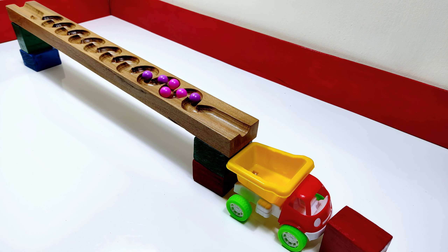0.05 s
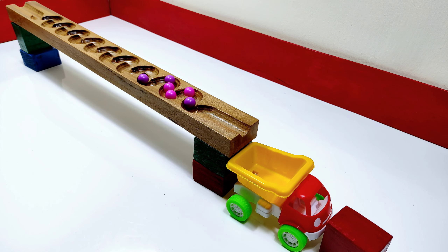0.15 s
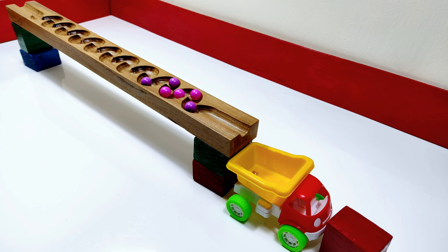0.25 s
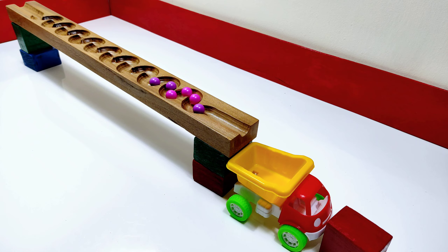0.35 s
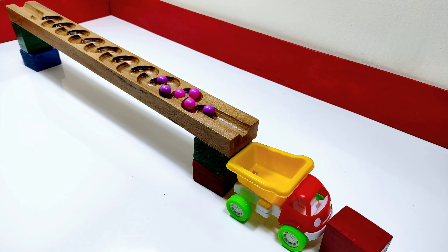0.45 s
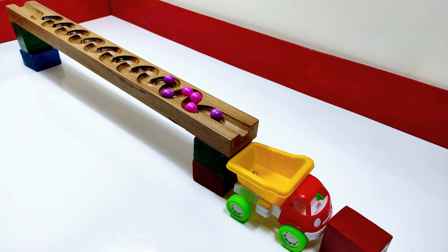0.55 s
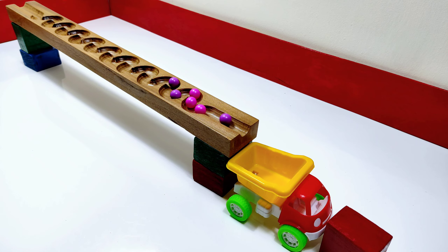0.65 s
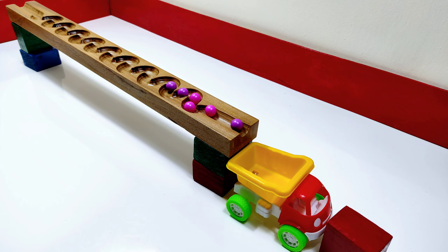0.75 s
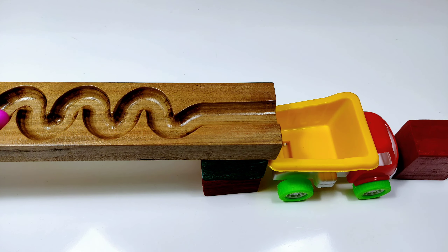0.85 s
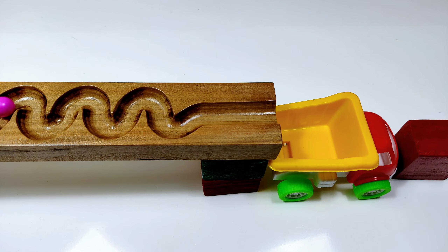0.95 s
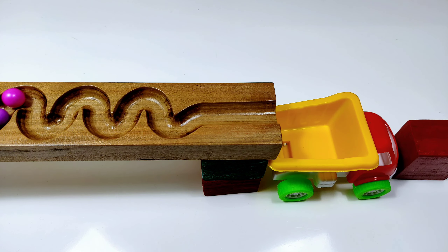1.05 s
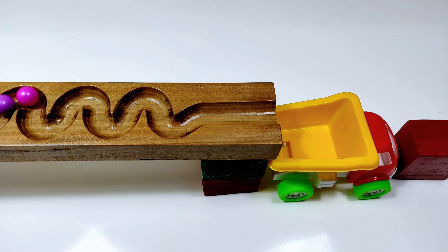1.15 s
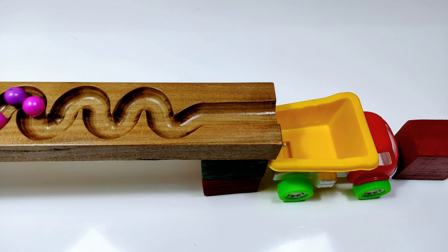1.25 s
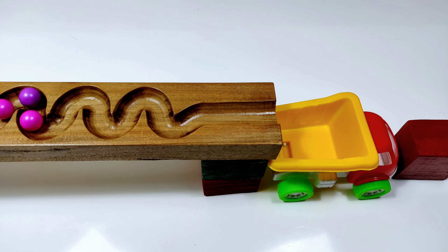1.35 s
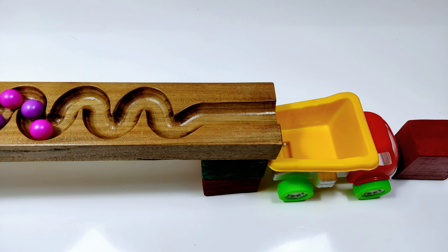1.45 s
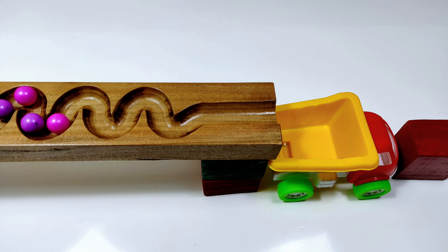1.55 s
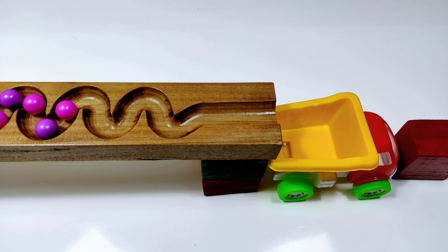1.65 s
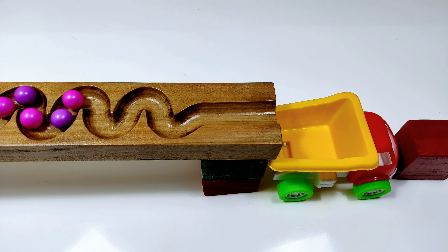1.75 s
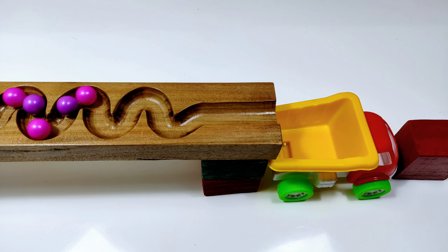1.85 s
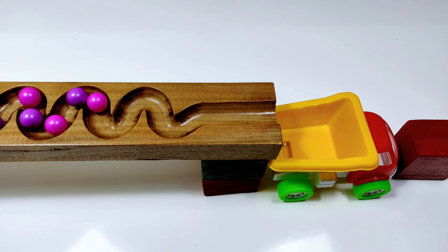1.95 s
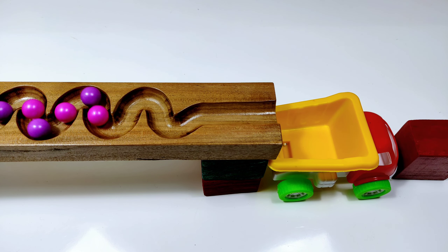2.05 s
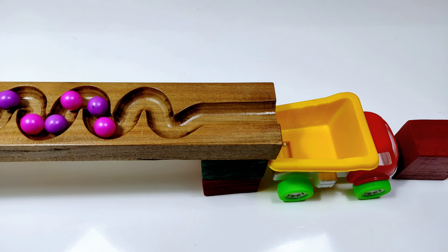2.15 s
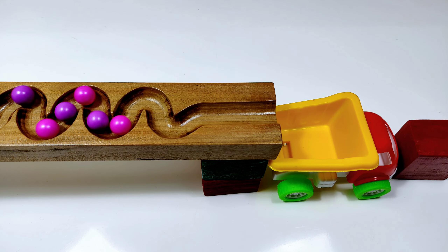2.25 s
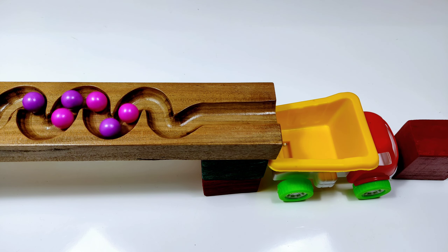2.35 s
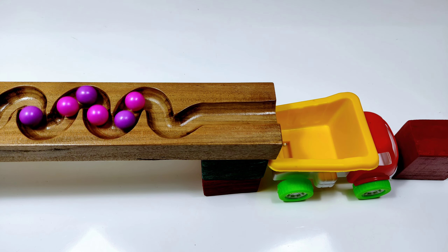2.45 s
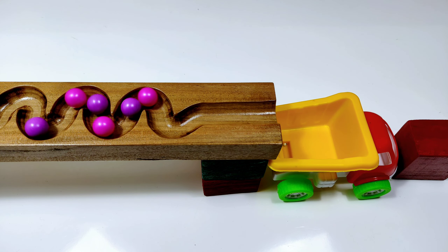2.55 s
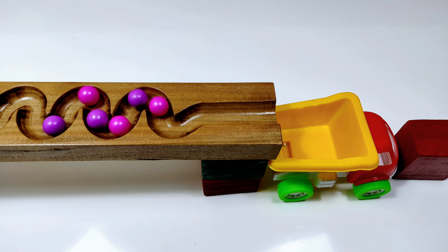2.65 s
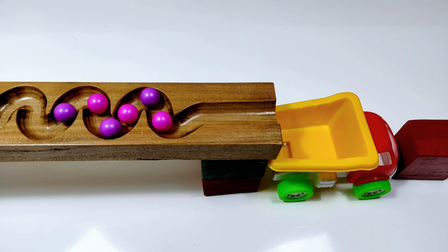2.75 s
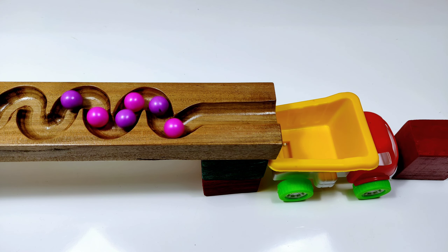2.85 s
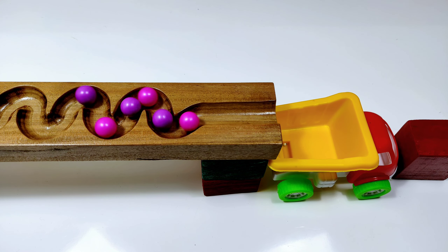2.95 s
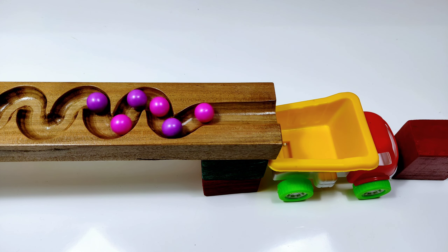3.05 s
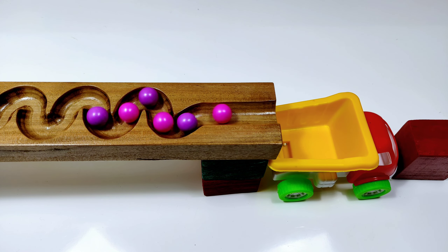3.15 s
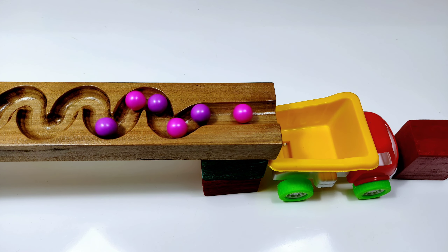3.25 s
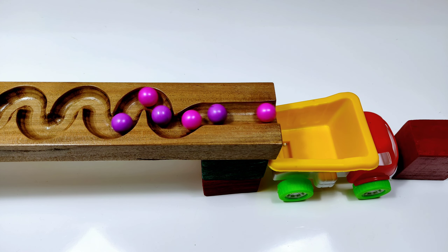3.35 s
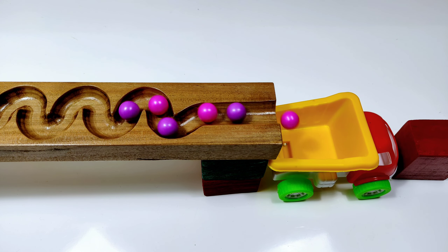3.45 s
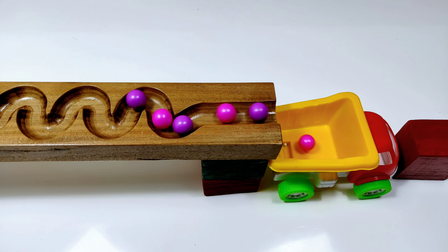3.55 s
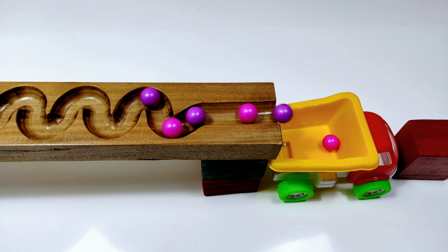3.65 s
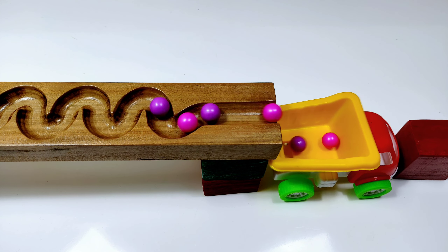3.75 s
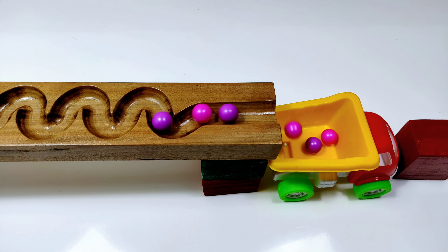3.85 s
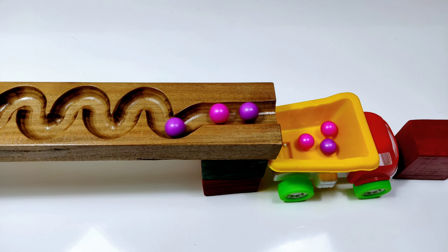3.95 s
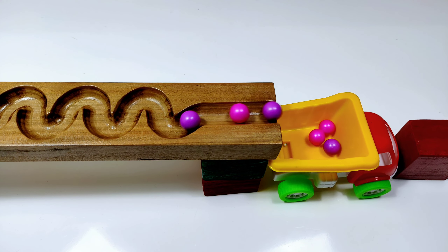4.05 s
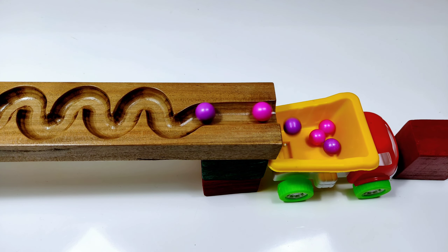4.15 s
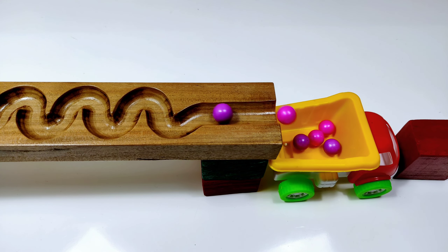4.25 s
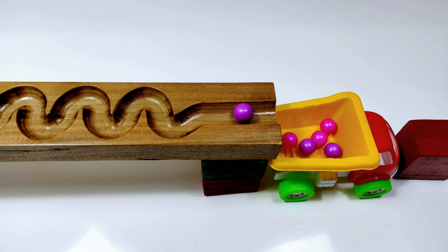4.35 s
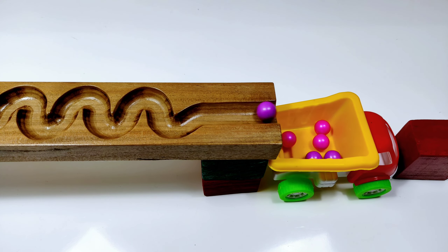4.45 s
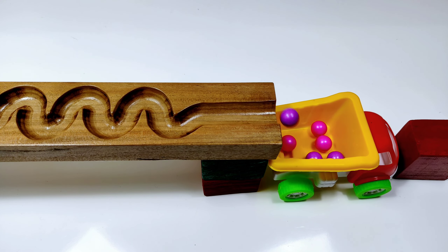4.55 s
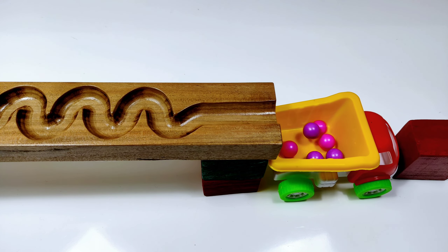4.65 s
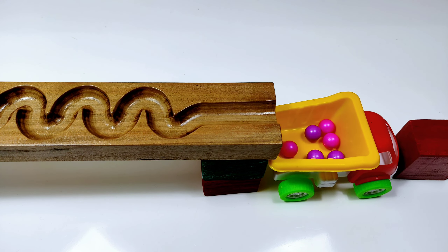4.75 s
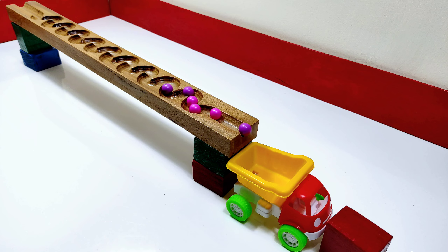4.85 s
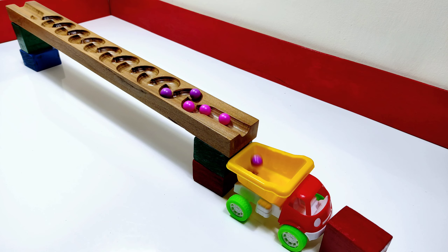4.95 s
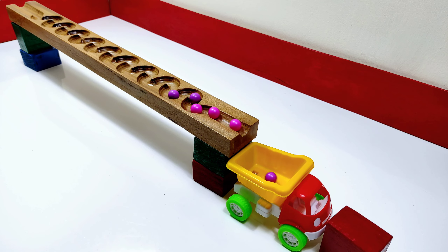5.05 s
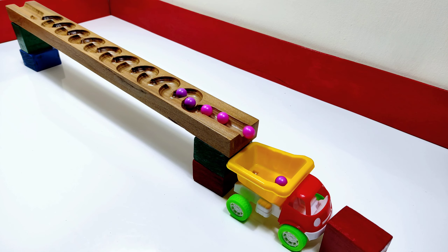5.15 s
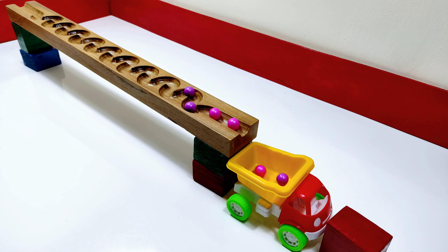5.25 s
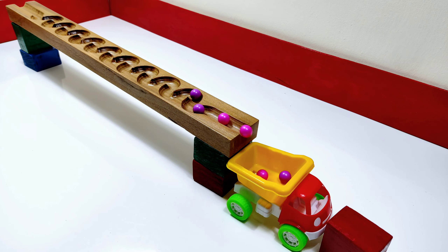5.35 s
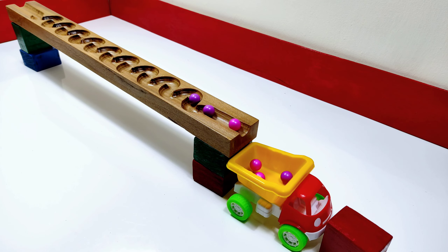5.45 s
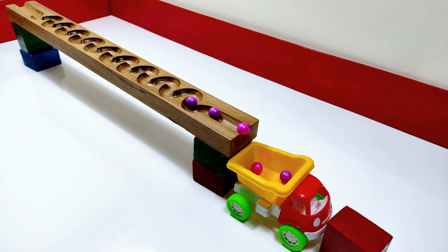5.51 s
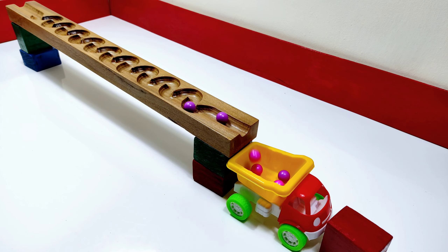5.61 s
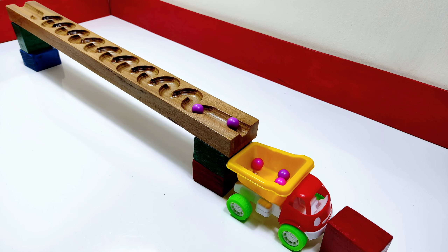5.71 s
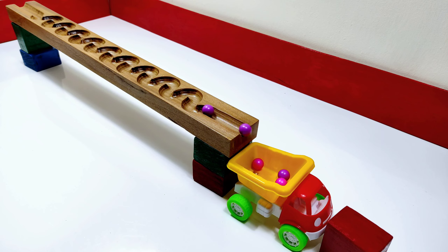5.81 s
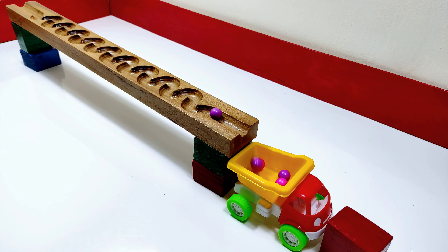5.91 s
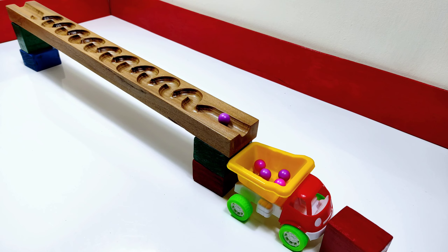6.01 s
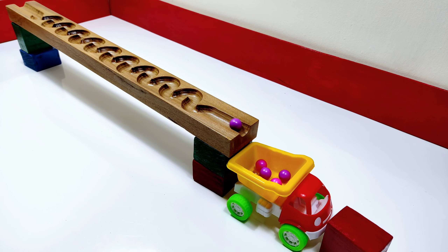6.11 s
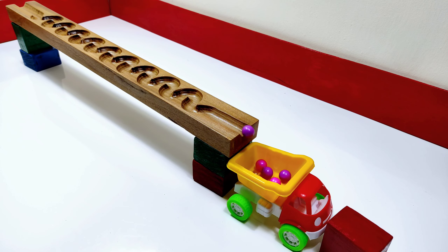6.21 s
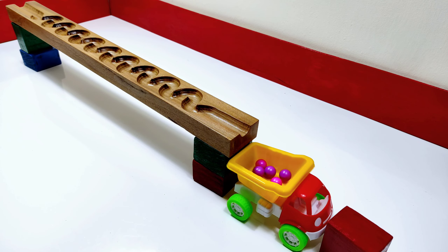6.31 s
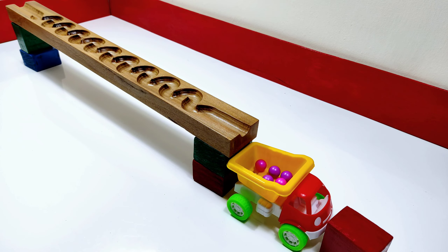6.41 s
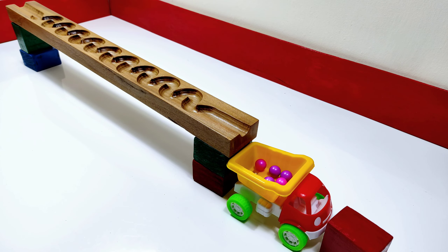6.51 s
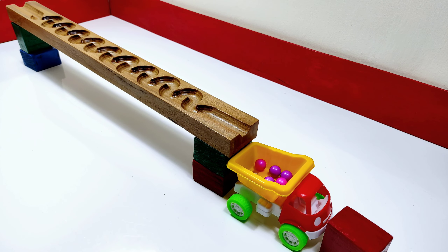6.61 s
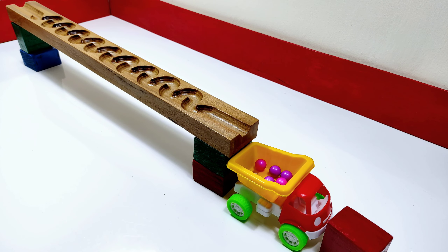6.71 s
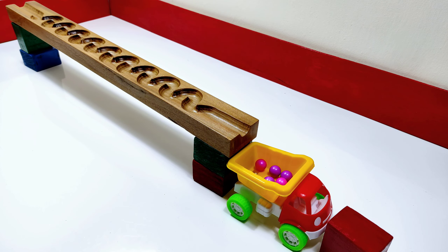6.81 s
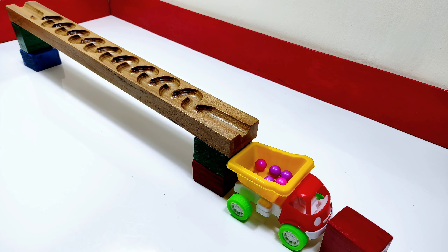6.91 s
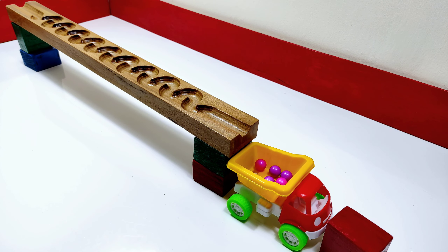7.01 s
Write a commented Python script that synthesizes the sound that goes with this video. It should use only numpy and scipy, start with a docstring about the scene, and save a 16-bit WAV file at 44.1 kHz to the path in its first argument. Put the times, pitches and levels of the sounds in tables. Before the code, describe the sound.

Soft woody rolling and pattering knocks come first, far quieter than what follows. Then marbles strike thin hard plastic about every quarter to half second, cracking sharply, bouncing and ticking against each other in the truck bed. A very brief dip separates this from another series of crisp drops, slightly quieter. The last bounce dies quickly into low rumble and steady hiss, captured close in a small hard room.

```python
"""In a bare room, glass marbles roll down the winding groove of a wooden beam, knocking at each bend.
They drop one by one into the plastic bed of a toy truck, bounce and clack together.
Bed and beam are sets of ringing tones struck by clicks; glass cracks and echoes are shaped noise.
Below lie a low rumble and steady hiss. A gain control ducks a few milliseconds after each loud clack;
twice the level dips briefly, and between these dips the beam is heard from its side."""
import sys
import numpy as np
from scipy import signal
from scipy.fft import rfft, irfft
from scipy.io import wavfile

SR = 44100
rng = np.random.default_rng(int(sys.argv[2]) if len(sys.argv) > 2 else 0)


def waveform_to_disk(signal):
    """Save audio, clipped to [-1, 1], as 16-bit WAV at the path in sys.argv[1]."""
    frames = np.transpose(np.atleast_2d(signal))
    scaled = np.clip(frames, -1, 1) * 32767
    samples = np.round(scaled).astype(np.int16)
    wavfile.write(sys.argv[1], SR, samples)


N = 312007

# All levels in the tables are relative: the layers and the microphone scale them further.
# Marbles hitting the truck bed or each other: [t/s, peak level/dB,
# crack above 4500 Hz: level/dB, clack from 1800 to 4500 Hz: level/dB]
DROPS = [(3.536, -0.5, 3, -4.5), (3.556, -19.5, -3, -6), (3.592, -11.5, -1.5, -3.5),
         (3.596, -21.5, -8.5, 5), (3.629, -15, 0.5, -7), (3.647, -22, -2, -7), (3.679, -13.5, -3, -7),
         (3.708, -27.5, 8, 6), (3.769, 0, 3, -6.5), (3.79, -20, -15.5, -12), (3.819, -20.5, -4, 8.5),
         (3.858, -18, -16, -2.5), (3.876, -26, -3, 5.5), (3.909, 0.5, 1.5, -6), (3.956, -13, 0, 4),
         (3.967, -19, -4, 1), (3.991, -10, 3, 0.5), (4.022, -14.5, -10, -7), (4.051, -20, -7, -7.5),
         (4.066, -26.5, 12.5, -8.5), (4.191, -39, -3, 15.5), (4.211, -1, 3.5, -4.5),
         (4.262, -12.5, -9.5, 1.5), (4.278, -14.5, 4, -0.5), (4.306, -17.5, -1, -0.5),
         (4.339, -3.5, 5.5, 6), (4.344, -16, -1.5, -9), (4.362, -20.5, 2, 2.5), (4.365, -10.5, 3, -9.5),
         (4.387, -21, 9.5, 2), (4.395, -6.5, 7, 1.5), (4.435, -10, 0, -14), (4.461, -13.5, -8, 1),
         (4.503, -18.5, -10, -21), (4.558, -17, -3, -3.5), (4.572, -21, -19, -12), (4.620, -2, 3.5, -4.5),
         (4.634, -23, -12, -14), (4.662, -17, -14, 4), (4.665, -12, 6, 1), (4.675, -10, 0, -9),
         (4.697, -20.5, -5, -10), (4.71, -6.5, 3, -5), (4.727, -21, -12, 5), (4.741, -14.5, -11, -19),
         (4.749, -16.5, 1, -1), (4.754, -9.5, 1, -4), (4.773, -21, -9, -13), (4.793, -27, -9, -6),
         (4.994, -7.5, 8.5, 4.5), (5.044, -20, 5.5, 4.5), (5.076, -42, 11, 9.5), (5.143, -20, -1, 0.5),
         (5.169, -32, 4, -0.5), (5.267, -6.5, 9.5, -0.5), (5.32, -18, 6.5, 5.5), (5.356, -22, 3.5, 1),
         (5.387, -26.5, 0, 0), (5.468, -9, 8, 4), (5.499, -5.5, 4.5, -7), (5.514, -13, -9.5, 2),
         (5.527, -27.5, -3, 2.5), (5.548, -24, -5, -7), (5.574, -18, -16.5, -6.5), (5.597, -36, 1.5, 12),
         (5.656, -8.5, 8, 0.5), (5.668, -13.5, 5.5, -1.5), (5.685, -24, -5, -5), (5.7, -11, 3.5, -2.5),
         (5.715, -14.5, -2, -13.5), (5.736, -21.5, -2, -13), (5.762, -19, 0.5, -10),
         (5.814, -19.5, 2.5, -0.5), (5.842, -29.5, 9.5, 3), (5.870, -34.5, -4.5, 3), (5.957, -5, 8.5, 2.5),
         (6.006, -13.5, 9, -4), (6.023, -13.5, 1, 0.5), (6.052, -16.5, -4, -1), (6.07, -24.5, -4.5, -3),
         (6.336, -3, 4.5, -0.5), (6.341, -18.5, 16, -8.5), (6.397, -14, 9, 1.5), (6.415, -14.5, -2, 1.5),
         (6.557, -48, 1, 11)]
# Tones of the plastic bed and chassis: [f/Hz, level/dB, time to fall by 60 dB t60/s]
BED_MODES = [(111.5, -21.5, 0.097), (165.2, -27, 0.22), (225, -30, 0.12), (261, -26.5, 0.13),
             (303, -25.5, 0.067), (440, -20.5, 0.022), (590, -32.5, 0.0051), (1057, -13.5, 0.017),
             (1106, -10, 0.023), (1152.4, -4.5, 0.025), (1275.8, 1, 0.017), (1362, -2, 0.016),
             (1468, -5.5, 0.015), (1625, -9, 0.024), (2224, -9.5, 0.0086), (2435, -5, 0.0044),
             (2560, -18, 0.004), (3740, -11.5, 0.0013)]
# Bands of the crack of glass on a hard surface: [f/Hz, width/Hz, level/dB]
CRACK_BANDS = [(2747, 4300, -4.5), (4055, 3200, -4.5), (5820, 1030, -2), (6950, 1000, -10), (7380, 1140, 0),
               (8716, 1140, -3), (10250, 3800, -22), (13800, 1900, -33.5)]
# Echo of the first and of the second round of drops: [glass crack level/dB, bed level/dB]
FIRST_ECHO_DB = (-27, -32.5)
SECOND_ECHO_DB = (-26.5, -28.5)
# Marbles knocking on the groove wall: [t/s, peak level/dB, brightness/(dB per octave)]
KNOCKS = [(0.027, -36.5, 11), (0.089, -41, -16), (0.129, -44, -2), (0.185, -37, 4), (0.194, -38, -10),
          (0.389, -37, 4), (0.451, -37, -2), (0.463, -44, 3), (0.485, -36, -15), (0.502, -38, -20),
          (0.569, -35, -12), (0.69, -46, -6), (0.736, -51, 4), (0.868, -36.5, 16), (0.878, -30, -4),
          (0.899, -35.5, -14.5), (0.91, -40, 15), (0.928, -43, -15), (1.016, -40, 1), (1.074, -34.5, -2),
          (1.099, -39.5, 21.5), (1.118, -39, -18), (1.192, -33.5, -2), (1.297, -31.5, -6), (1.308, -32, 8),
          (1.325, -42, -13), (1.394, -37, 0), (1.413, -38, 1), (1.431, -30.5, -4.5), (1.46, -39, -6),
          (1.488, -38, 7), (1.502, -35, -8), (1.545, -32, -4), (1.57, -36, -4), (1.63, -35, 0),
          (1.645, -40, -1), (1.74, -36, 8), (1.751, -36, 14), (1.803, -38.5, -14), (1.813, -27.5, -2),
          (1.824, -42, 21), (1.894, -36, 3), (1.923, -34.5, 4), (2.003, -47, 0), (2.014, -35, 0),
          (2.139, -38, 2), (2.156, -38.5, -3), (2.176, -31, 4.5), (2.365, -40.5, 5), (2.495, -37, -2),
          (2.532, -35, -9), (2.615, -41, 1), (2.647, -38.5, -6), (2.703, -34.5, 1), (2.775, -45, -6),
          (2.796, -32, 7), (2.812, -27.5, 3), (2.871, -32, -3), (2.905, -34.5, -4), (3.032, -37, -3),
          (3.042, -33, 4), (3.096, -33, 8.5), (3.202, -36, 3), (3.222, -30.5, 3), (3.254, -30, -3),
          (3.293, -30.5, -5.5), (3.307, -34, -8), (3.413, -30, 1), (3.483, -34.5, 11)]
# Rolling in the groove: [t/s, drone level/dB, level/dB of the rattle between the bends]
ROLL = [(0.0, -47, -53), (0.05, -48, -56), (0.17, -50.5, -47.5), (0.27, -49, -53.5), (0.35, -50.5, -63),
        (0.46, -50, -59), (0.53, -48.5, -52), (0.6, -48, -54), (0.65, -56, -75), (0.76, -45, -49),
        (0.88, -59.5, -59), (1.0, -54.5, -62), (1.15, -50, -47), (1.36, -54.5, -73), (1.55, -50, -59),
        (1.8, -50.5, -74), (2.25, -50, -56.5), (2.7, -48, -58.5), (3.5, -51, -58), (4.2, -47.5, -56),
        (4.6, -64.5, -69), (4.86, -47, -52), (5.4, -47.5, -48), (5.9, -58, -60.5), (6.25, -59, -69),
        (6.4, -79, -76.5), (7.07, -77, -84)]
# Marble-on-marble ticks in the groove: [t/s, peak level/dB]
TICKS = [(2.413, -38), (2.588, -45), (2.957, -45)]
# Tones of the wooden beam: [f/Hz, width/Hz, rolling level/dB, knock level/dB,
# change of level/dB when heard from its end]
BEAM_MODES = [(406, 44, -16, -17.5, 6.5), (453.7, 46, -1, -19.5, -3.5), (523, 59, -11, -17.5, 5),
              (650, 1700, -0.5, -21, -7.5), (930, 50, -3, -11.5, 2), (1309, 130, 4.5, 1.5, -3),
              (1970, 110, -4, 7, 7), (2006, 47, -2, 4.5, 2), (2294, 84, -12, -15, 15),
              (2727, 53, -15.5, -5.5, -1), (2830, 50, -1.5, -4, -2.5), (2928, 80, -20.5, 0, -8),
              (3030, 180, -28.5, -5.5, -7), (2420, 540, -6.5, -6, -1.5), (3400, 700, -14, -9.5, -10),
              (3742, 39, -21, -7, -6), (4750, 39, -17, -12, 1), (5840, 57, -18, -22.5, 5)]
# How much later the left side hears the beam from its side: [f/Hz, lag/samples]
SIDE_LAG = [(500, 5), (1300, 17), (2000, 18), (2900, 12), (3700, 13)]
# Brief dips of the level: [t/s, length/s]
DIPS = [(0.814, 0.0066), (4.866, 0.0046)]
# Low rumble of the table and the air: [t/s, level/dB under 50 Hz, level/dB from 80 to 300 Hz]
RUMBLE = [(0.0, -54, -53), (0.38, -55, -56.5), (0.55, -50, -59.5), (0.8, -64, -55), (1.3, -95, -53.5),
          (2.0, -54, -59.5), (2.5, -79, -61), (3.0, -78, -58.5), (3.5, -76, -53.5), (4.8, -65, -65),
          (5.0, -58, -50), (6.3, -61, -63), (6.69, -54, -65), (6.85, -52, -56), (6.95, -56.5, -50),
          (7.07, -64, -54.5)]
# Colour of the hiss: [f/Hz, level/dB]
HISS_COLOUR = [(25, -8), (60, -2), (200, -0.5), (400, -3.5), (800, -9.5), (1600, -11), (3000, -18),
               (4500, -20), (6000, -17), (7600, -8), (9200, -13.5), (10000, -31.5), (15000, -41.5)]
# Echoes of the room: [f/Hz, time to fall by 60 dB t60/s, level/dB]
ROOM = [(93, 0.41, -10), (266, 0.45, 1), (687, 0.47, 0.5), (1180, 0.28, -6.5), (1740, 0.33, -0.5),
        (4780, 0.32, -6), (8100, 0.33, -4.5), (12800, 0.13, -0.5)]
# How alike the echoes are on both sides: [f/Hz, likeness (1 = the same)]
LIKENESS = [(60, 0.84), (180, 0.98), (550, 0.62), (1650, 0.16), (4970, 0.083), (15000, 0.11)]
# Lean of the microphone: [f/Hz, level/dB of left above right]
LEAN = [(60, 3), (200, 7), (400, 2.5), (700, 5), (1300, 3.5), (2400, 2), (4400, -3), (8000, -1.5),
        (15000, 7)]

# Truck
SPOT_DB = 2.3   # spread of a bed tone from blow to blow
SOFTENS = 0.32   # dB of sharp click lost per dB that a blow is weaker than the hardest
CRACK_T60_S = 0.012
RATTLE_DB, RATTLE_T60_S = -38, 0.16   # the small rebounds stay well under the blows

# Beam; a knock leaves the marble rattling through the bend
BEND_RATTLE_DB, BEND_RISE_S, BEND_T60_S = -10.5, 0.0098, 0.083
DRONE_WAVER_DB, DRONE_WAVER_HZ = 2.5, 5.9
# Heard from the end: weaker first contact, stronger rattle, left side later by this many samples
END_KNOCK_DB, END_RATTLE_DB, END_LAG_SAMPLES = -10, 1, 11

# Background, room and microphone
BEAM_ROOM_DB, FIRST_WALL_S = -32, 0.0022
HISS_DB = -59   # before the microphone's lean and gain control
CUTOFF_HZ = 16900


def truck(rows, crack_echo_db, bed_echo_db):
    """Each marble sets the plastic bed ringing and its glass cracks; the room echoes both."""
    luck = rng.normal(0, 1, (len(rows), len(BED_MODES), 3))   # per blow and tone: [both sides, left, right]
    body = bed(rows, luck)
    glass = crack(rows, luck)
    return body + glass + room(amp(bed_echo_db) * body + amp(crack_echo_db) * glass)


def bed(rows, luck):
    """A blow rings every tone of the bed with its own strength, then the marble rattles on."""
    s, peak_db, _, clack_db = np.transpose(rows)
    rebounds = grains(200, spread_db=3.0)   # many small, even rebounds
    fading = dying(clicks(s, amp(peak_db + RATTLE_DB)), RATTLE_T60_S)
    rattle = band(fading * rebounds, 640, 2600)
    body = 0
    for k, (hz, db, t60) in enumerate(BED_MODES):
        # where the bed is struck, and how it faces each side
        spot_db = SPOT_DB * luck[:, k, :1] + 1.0 * luck[:, k, 1:]
        if hz > 1800:
            spot_db = spot_db + clack_db[:, None]
        blows = clicks(s, amp(peak_db[:, None] + spot_db))
        tone = ring(blows + rattle, hz, t60)
        # a wall tone radiates little away from its pitch
        tone = band(band(tone, 0.863 * hz, 1.157 * hz), 0.72 * hz, 1.4 * hz)
        body = body + amp(db - 3.0) * tone
    # the bed's sound keeps clear of the deep bass below about 90 Hz
    return signal.sosfilt(signal.butter(2, 90, "high", fs=SR, output="sos"), body)


def crack(rows, luck):
    """Hard glass gives a sharp click and a short burst of noise; weaker blows click more softly."""
    s, peak_db, crack_db, clack_db = np.transpose(rows)
    softer_db = SOFTENS * (peak_db - peak_db.max())
    white = rng.standard_normal(N) + 1.49 * rng.standard_normal((2, N))
    glass = 0
    for k, (hz, width, db) in enumerate(CRACK_BANDS):
        snap_db = peak_db + (crack_db if hz > 4500 else clack_db)
        side_db = 2 * luck[:, k, 1:]
        snap = clicks(s, amp(snap_db[:, None] + side_db))
        sharp = clicks(s, amp((snap_db + softer_db)[:, None] + side_db))
        burst = amp(13.0) * sharp + amp(-6.0) * dying(snap, CRACK_T60_S) * white
        # every other band is turned upside down
        glass = glass + (-1) ** k * amp(db) * band(burst, hz - width / 2, hz + width / 2)
    return glass


def beam():
    """Rolling and wall knocks ring the tones of the wooden beam; now and then two marbles tick."""
    t = np.arange(N) / SR
    from_end = (t < DIPS[0][0]) | (t > DIPS[1][0])   # between the dips: from its side
    wood = 0
    for mode, rolling, knocking in zip(BEAM_MODES, roll(), knock(from_end)):
        hz, end_db = mode[0], mode[4]
        # the rattling high tones are stronger from the end
        if hz >= 1700:
            rolling = rolling * amp(END_RATTLE_DB * from_end)
        view = amp(end_db * from_end)
        wood = wood + left_later(view * (rolling + knocking), from_end, hz)
    # wood gives a soft contact
    wood = signal.sosfilt(signal.butter(2, 5500, fs=SR, output="sos"), wood)
    s, tick_db = np.transpose(TICKS)
    ticks = band(clicks(s, amp(tick_db + 26.5)), 7000, 8240)
    both = (wood + ticks) * amp([[-1.4], [0]])   # the beam lies to the right
    return both + amp(BEAM_ROOM_DB) * room(both)


def roll():
    """Low tones drone under the rolling weight; high ones rattle on the bumps of the groove."""
    drone_db, rattle_db = in_time(ROLL)
    s, peak_db, _ = np.transpose(KNOCKS)
    struck = clicks(s, amp(peak_db + BEND_RATTLE_DB))[0]
    bend_rattle = dying(struck, BEND_T60_S) - dying(struck, BEND_RISE_S)   # swells, then fades
    rattle = amp(rattle_db) + bend_rattle
    drone = amp(drone_db + DRONE_WAVER_DB * drift(DRONE_WAVER_HZ))
    bumps = grains(770, spread_db=4.5)   # shared by all high tones
    for hz, width, roll_db, _, _ in BEAM_MODES:
        if hz < 1700:
            force, level = grains(1500, spread_db=3.0), drone
        else:
            force, level = 0.5 * bumps + grains(1500, spread_db=2.5), rattle
        yield rms_one(ring(force, hz, width_to_t60(width))) * level * amp(roll_db - 7.0)


def knock(from_end):
    """A bend strikes the tones of the wood, then the marble chatters a few hundredths of a second."""
    s, peak_db, tilt_db = np.transpose(KNOCKS)
    spot_db = rng.normal(0, 3, (len(s), len(BEAM_MODES), 2))   # each knock meets each tone differently
    skips = grains(900, spread_db=1.5)
    for k, (hz, width, _, knock_db, _) in enumerate(BEAM_MODES):
        bright_db = tilt_db * np.log2(max(hz, 1300) / 2400)
        blows = clicks(s, amp((peak_db + bright_db)[:, None] + spot_db[:, k]))
        swell = dying(blows, 0.061) - dying(blows, 0.027)   # rises, then fades
        chatter = swell * skips * amp(-18.5)
        contact = amp(5.0 + END_KNOCK_DB * from_end) * blows
        tone = ring(contact + chatter, hz, width_to_t60(width))
        yield (-1) ** k * tone * amp(knock_db - 13)


def left_later(x, from_end, hz):
    """Sound from the beam reaches the left side later, by a lag that belongs to the view."""
    side_lag = int(at_hz(SIDE_LAG, hz))
    left = np.where(from_end, np.roll(x[0], END_LAG_SAMPLES), np.roll(x[0], side_lag))
    return np.array([left, x[1]])


def room(x):
    """Echoes in stereo: noise in third-octave bands, each dying at its own pace."""
    t = np.arange(SR) / SR
    edges = 70 * 2 ** (np.arange(25) / 3)
    white = rng.standard_normal((2, 2, SR))
    tail = 0
    for k, (low, high) in enumerate(zip(edges, edges[1:])):
        mid, side = band(white[k % 2], low, high)
        hz = np.sqrt(low * high)
        alike = np.clip(at_hz(LIKENESS, hz), -1, 1)
        fall = amp(at_hz(ROOM, hz, column=2) - 60 * t / at_hz(ROOM, hz))
        stereo = np.sqrt(1 + alike) * mid + np.sqrt(1 - alike) * side * [[1], [-1]]
        tail = tail + fall * stereo
    tail *= np.clip(t / FIRST_WALL_S, 0, 1) ** 2   # echoes build up after the direct sound
    mono = x.mean(axis=0)[None]
    return signal.fftconvolve(mono, tail, axes=1)[:, :N]


def rumble():
    """Low noise, nearly alike on both sides, with the table's two lowest tones ringing in it."""
    deep_db, low_db = in_time(RUMBLE)
    white = rng.standard_normal(N) + 0.24 * rng.standard_normal((2, N))
    deep = rms_one(band(band(white, 14, 45), 14, 48))
    table = rms_one(ring(white, 183, 0.21))
    table = table + amp(-6.0) * rms_one(ring(white, 108, 0.079))
    table = table + amp(-12.5) * rms_one(band(white, 40, 320))
    return amp(deep_db) * deep + amp(low_db) * rms_one(table)


def hiss():
    """Steady room and microphone hiss: coloured noise, partly shared by both sides."""
    white = rng.standard_normal((2, N)) + 0.5 * rng.standard_normal(N)
    coloured = colour(white, at_hz(HISS_COLOUR, np.fft.rfftfreq(N, 1 / SR)))
    return amp(HISS_DB) * rms_one(coloured)


def amp(db):
    """Turn dB into a gain."""
    return 10 ** (np.asarray(db) / 20)


def rms_one(x):
    """Scale to an average strength (rms) of 1."""
    return x / np.sqrt(np.mean(x ** 2) + 1e-20)


def in_time(rows):
    """Draw the columns of a table over time, one value per sample."""
    s, *columns = np.transpose(rows)
    return [np.interp(np.arange(N) / SR, s, c) for c in columns]


def at_hz(points, hz, column=1):
    """Read a table between its frequencies, on a log-frequency axis."""
    points = np.array(points)
    return np.interp(np.log(hz + 1), np.log(points[:, 0]), points[:, column])


def width_to_t60(width_hz):
    """The wider a tone's peak, the sooner it dies: seconds to fall by 60 dB."""
    return np.log(1000) / np.pi / width_hz


def ring(force, hz, t60):
    """A struck tone: each unit click starts a dying sine of height 1."""
    r = amp(-60 / (t60 * SR))
    w = 2 * np.pi * hz / SR
    return signal.lfilter([0, np.sin(w)], [1, -2 * r * np.cos(w), r * r], force + 1e-18)


def dying(blows, t60):
    """Each click starts an envelope that dies away by 60 dB in t60 seconds."""
    return signal.lfilter([1], [1, -amp(-60 / (t60 * SR))], blows + 1e-18)


def clicks(times, sizes):
    """Single-sample blows; sizes are one per blow, or rows of (left, right)."""
    out = np.zeros((2, N))
    np.add.at(out, (slice(None), np.round(times * SR).astype(int)), sizes.T)
    return out


def grains(per_s, spread_db):
    """Random tiny impacts, a few much bigger than the rest; rms 1."""
    size_db = spread_db * np.minimum(rng.exponential(1, N), 5)
    sizes = amp(size_db) * rng.choice([-1, 1], N)
    return rms_one(sizes * (rng.random(N) < per_s / SR))


def drift(rate_hz):
    """Slow random wander, spread 1: noise smoothed twice."""
    r = np.exp(-2 * np.pi * rate_hz / SR)
    smooth = signal.lfilter([1], [1, -2 * r, r * r], rng.standard_normal(N + SR))
    return rms_one(smooth[SR:])   # skip the first second, while it settles


def band(x, low_hz, high_hz):
    """Keep the sound between two frequencies."""
    return signal.sosfilt(signal.butter(2, [low_hz, high_hz], "band", fs=SR, output="sos"), x)


def colour(x, gains_db):
    """Apply a gain to each frequency, the same or different for each side."""
    return irfft(rfft(x) * amp(gains_db), N)


def scene():
    """Two rounds of drops over beam, rumble and hiss; the first round's echo ends at the second dip."""
    t = np.arange(N) / SR
    cut = DIPS[1][0]
    first = truck([r for r in DROPS if r[0] < cut], *FIRST_ECHO_DB) * (t < cut)
    second = truck([r for r in DROPS if r[0] >= cut], *SECOND_ECHO_DB)
    out = first + second + beam() + rumble() + hiss()
    for at, length in DIPS:
        out = out * np.clip(np.abs(t - at) / length - 0.2, 0.05, 1)
    return out


def gain_control(x, knee_db=-24, share=0.15, release_db_s=150, lag_s=0.0074, smooth_s=0.00027):
    """Loud peaks pull the gain down a little late; it climbs back at a steady rate."""
    level_db = 20 * np.log10(np.abs(x).max(axis=0) + 1e-9)
    over_db = np.maximum(level_db - knee_db, 0)
    ramp = release_db_s * np.arange(N) / SR
    held_db = np.maximum.accumulate(share * over_db + ramp) - ramp
    late_db = np.interp(np.arange(N) - lag_s * SR, np.arange(N), held_db)
    r = np.exp(-1 / (smooth_s * SR))
    return x * amp(-signal.lfilter([1 - r], [1, -r], late_db))


def record(dry):
    """The microphone leans by frequency, the gain ducks, peaks are rounded, the top is cut."""
    lean_db = at_hz(LEAN, np.fft.rfftfreq(N, 1 / SR)) * [[0.5], [-0.5]]   # half to each side
    x = gain_control(colour(dry, lean_db))
    rounded = 0.82 * np.tanh(x / 0.82)
    return signal.sosfilt(signal.cheby2(14, 95, CUTOFF_HZ, fs=SR, output="sos"), rounded)


dry = scene()
out = record(dry)
waveform_to_disk(out)
```